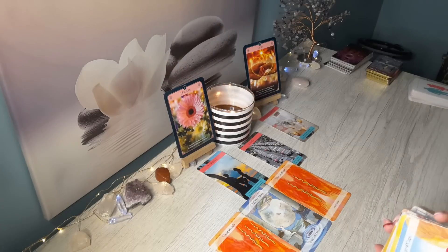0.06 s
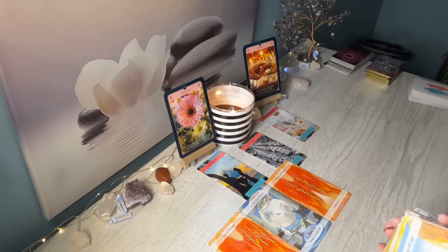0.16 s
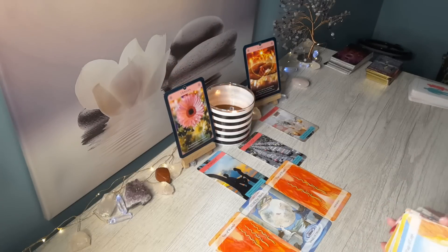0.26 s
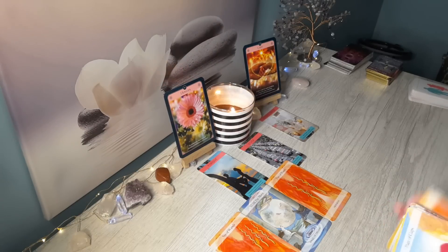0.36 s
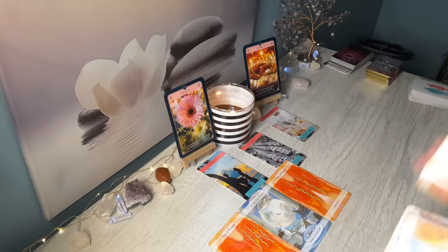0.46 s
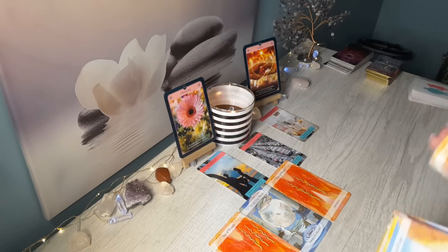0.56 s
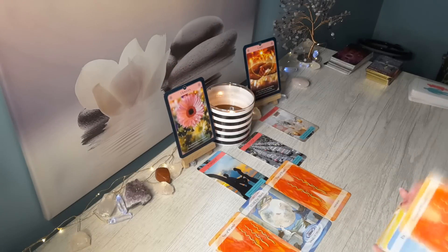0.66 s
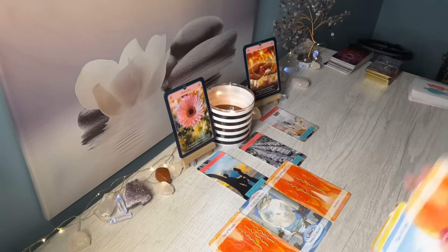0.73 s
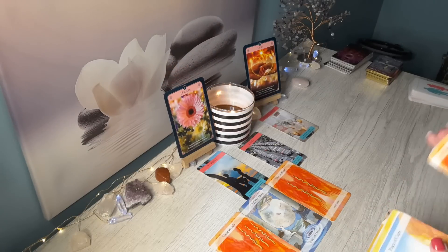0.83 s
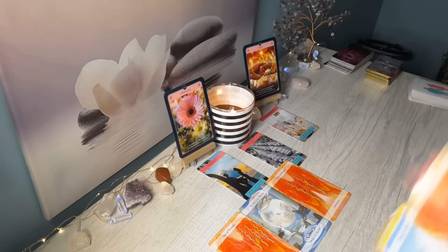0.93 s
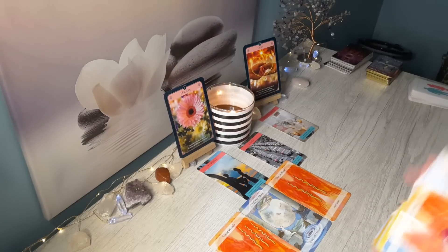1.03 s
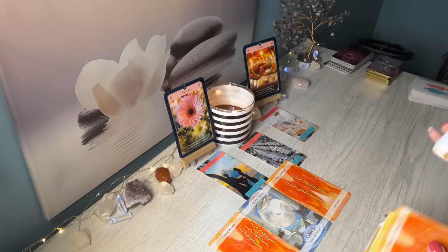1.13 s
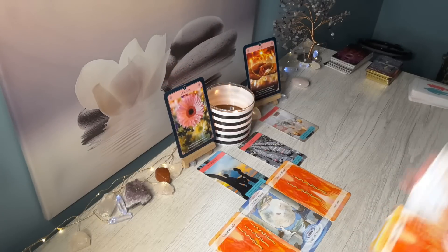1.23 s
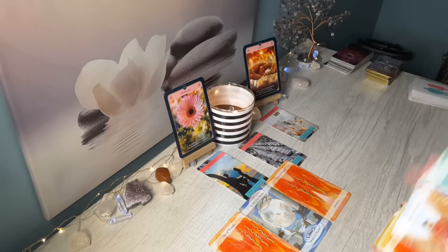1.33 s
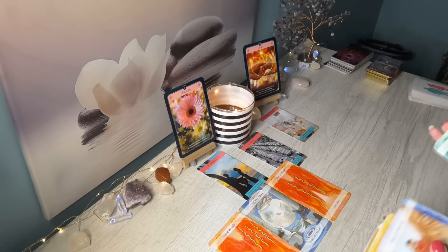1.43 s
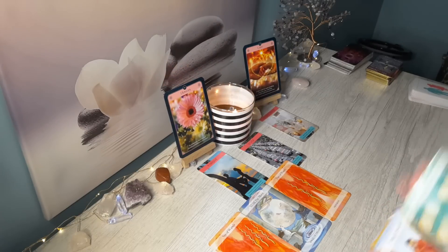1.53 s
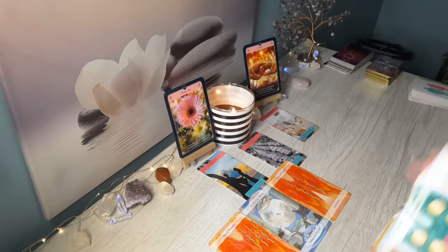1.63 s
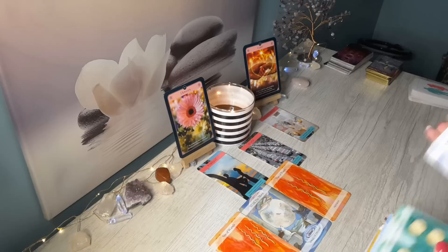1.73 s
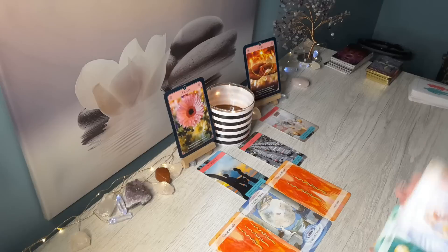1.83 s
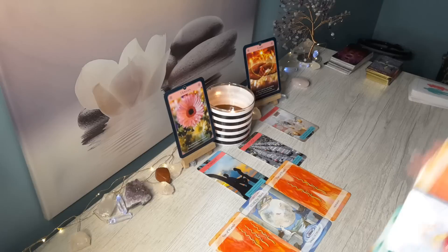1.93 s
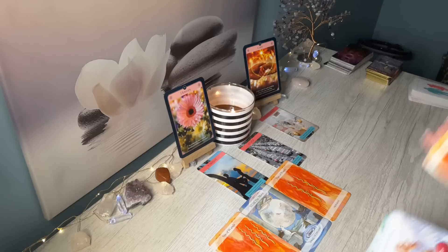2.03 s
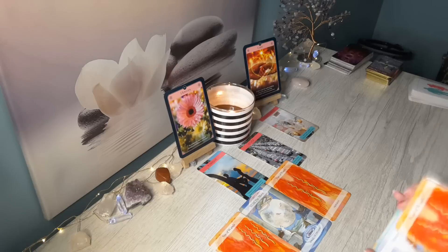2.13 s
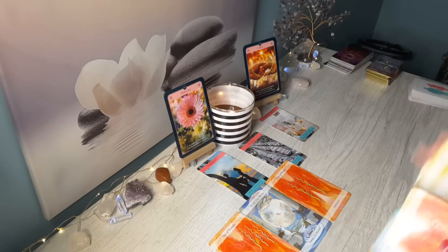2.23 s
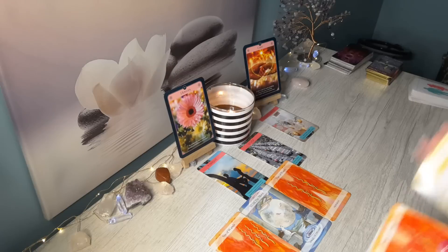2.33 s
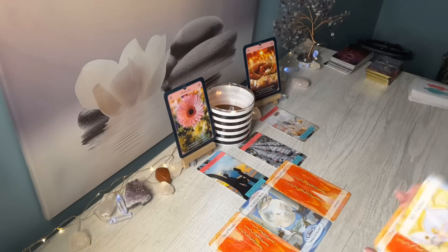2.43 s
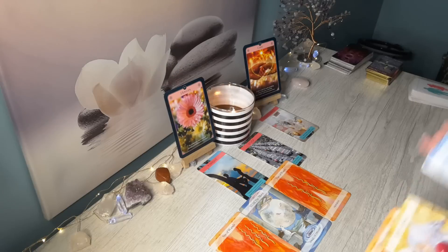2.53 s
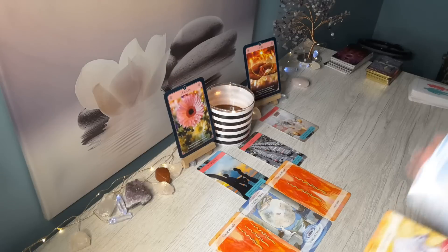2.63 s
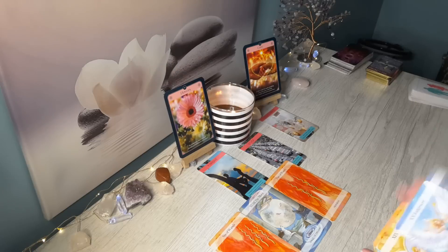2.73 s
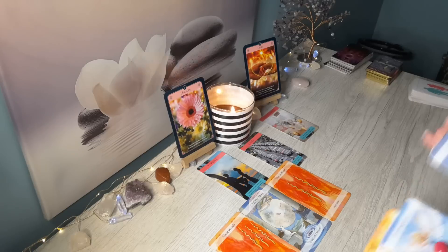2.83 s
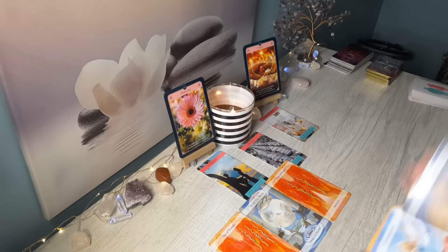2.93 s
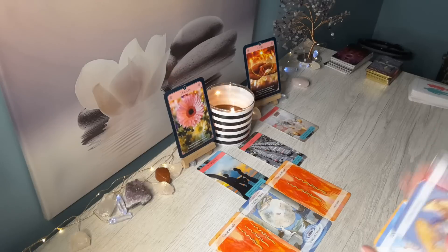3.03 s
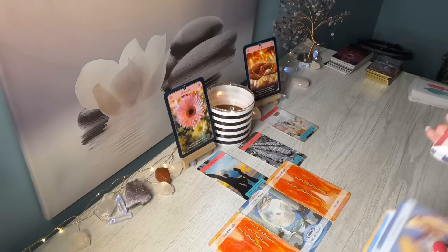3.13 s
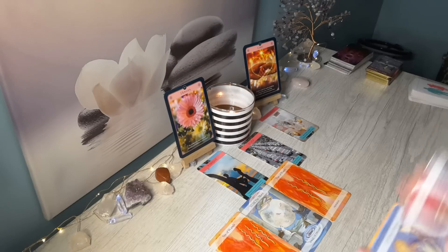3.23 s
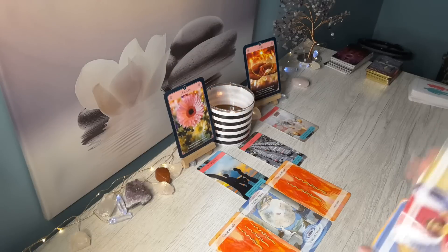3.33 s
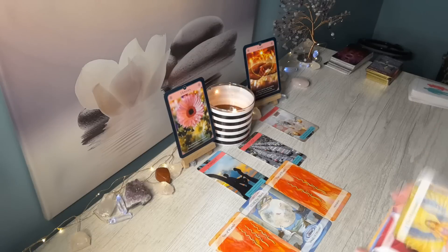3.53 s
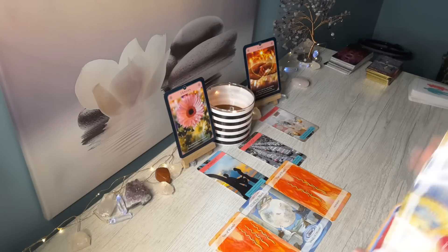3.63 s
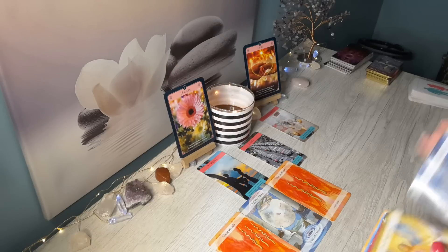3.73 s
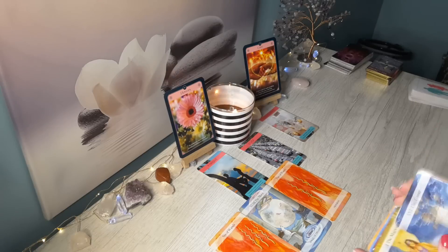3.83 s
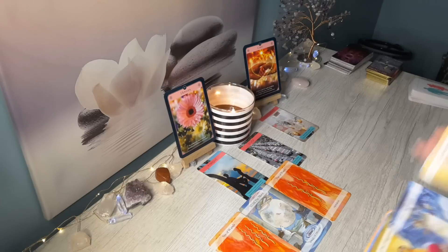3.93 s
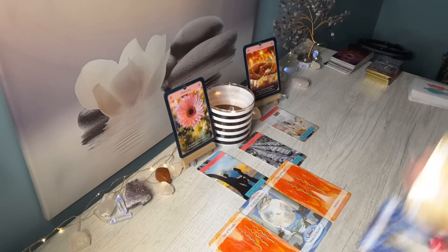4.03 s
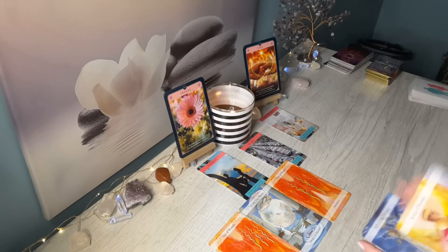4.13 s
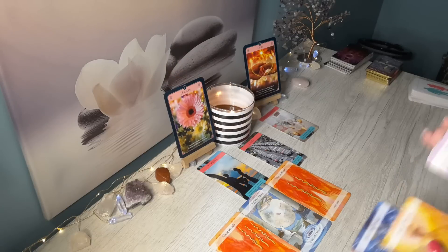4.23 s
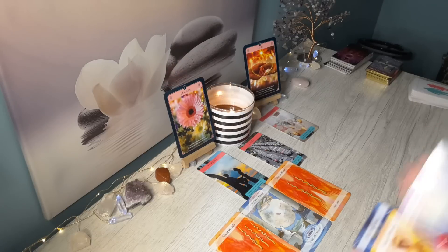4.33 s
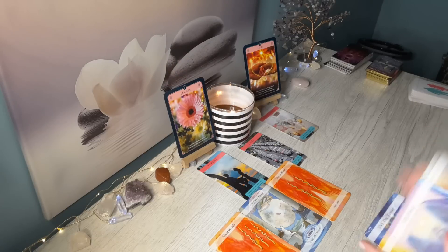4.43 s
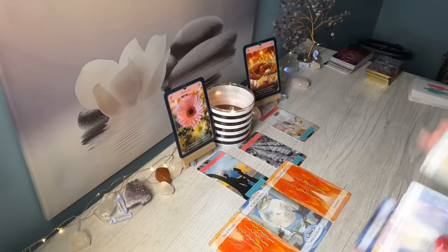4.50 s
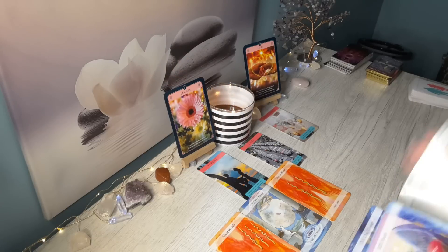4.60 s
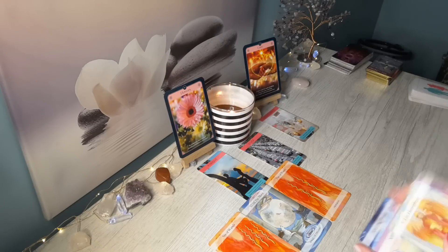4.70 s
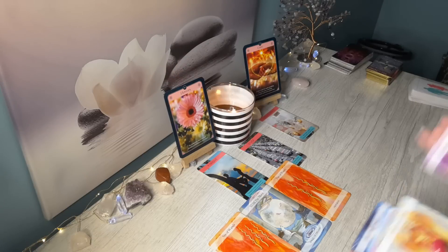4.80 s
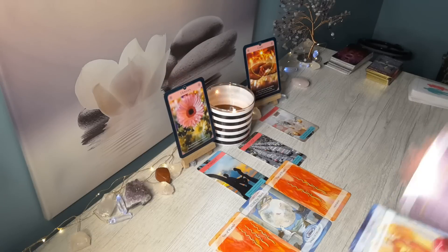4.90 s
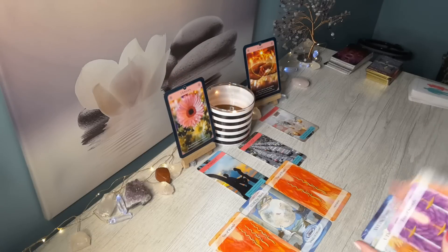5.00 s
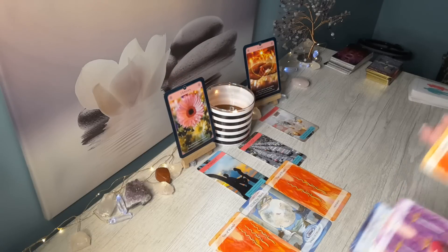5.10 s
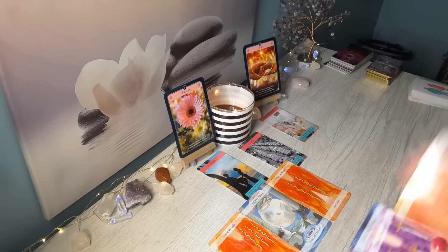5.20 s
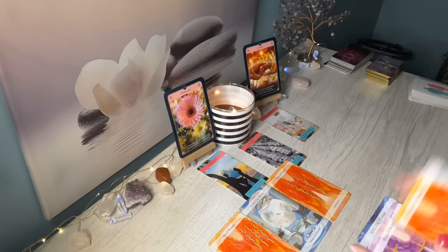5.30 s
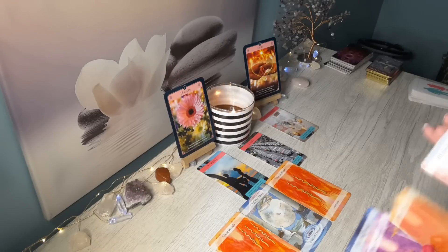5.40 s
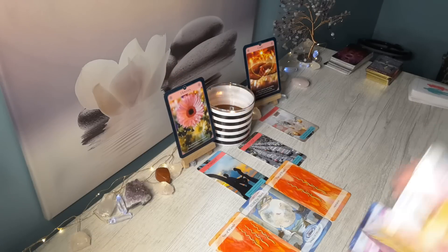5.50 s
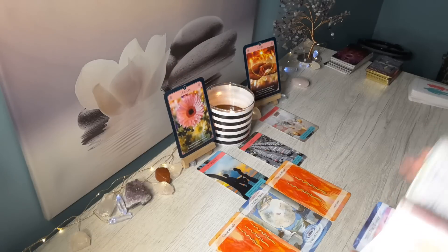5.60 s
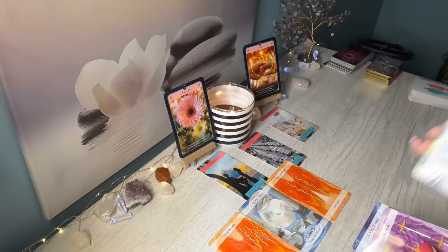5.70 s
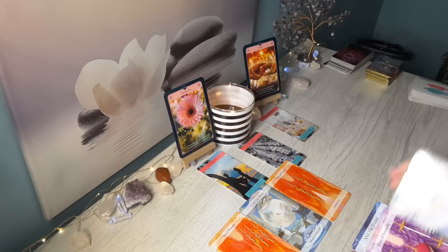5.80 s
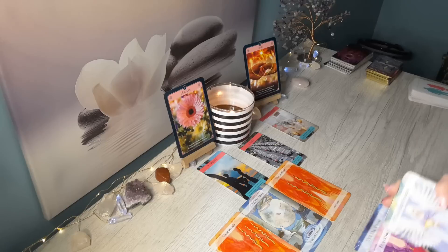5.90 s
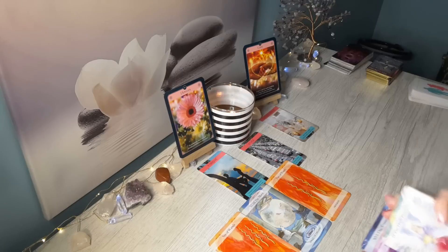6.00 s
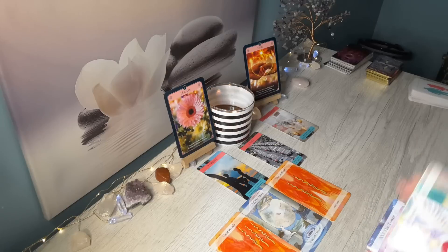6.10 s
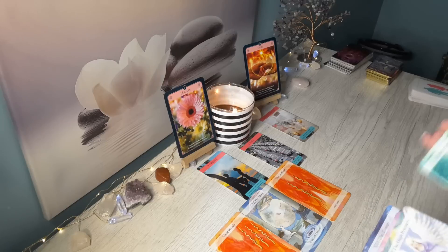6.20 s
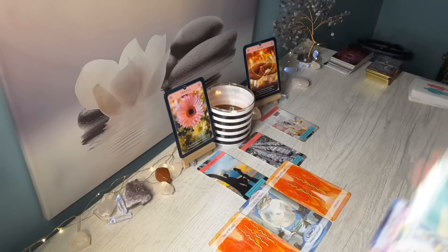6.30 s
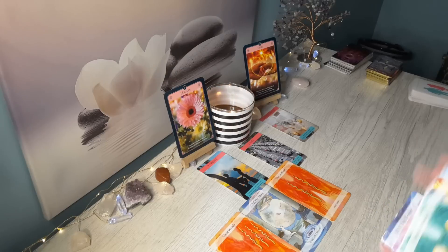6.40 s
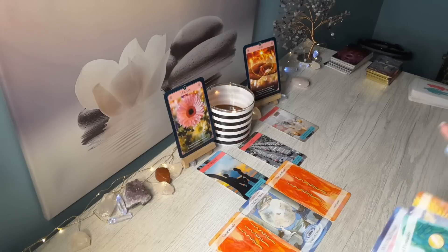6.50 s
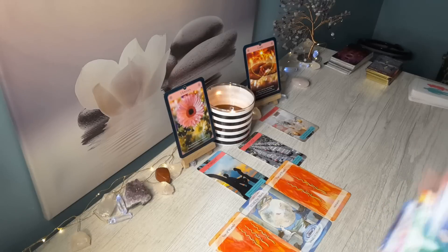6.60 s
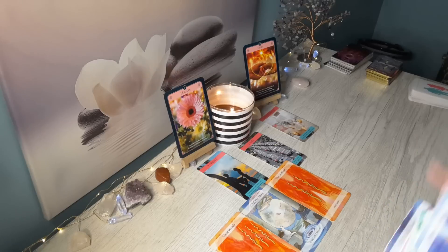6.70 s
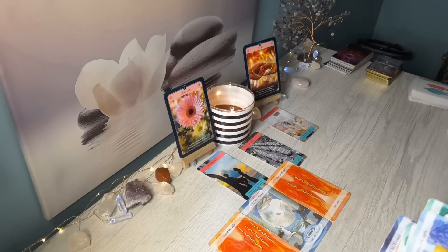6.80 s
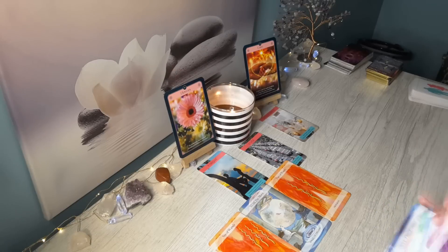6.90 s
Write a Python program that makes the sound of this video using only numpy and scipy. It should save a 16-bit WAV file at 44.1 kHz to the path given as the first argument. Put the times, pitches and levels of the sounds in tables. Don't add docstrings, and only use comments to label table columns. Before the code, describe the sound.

A small, quiet room with faint steady hush. From about 0.3 s a soft papery hiss rises, swelling at 0.45-0.6 s, with another airy rub near 0.8 s. At 1.1-1.2 s the first crisp slap lands and an overhand shuffle of stiff cards settles in, a stroke roughly every 0.3 s: thumb tick, gritty slide, bright snap, dull thump into the cupped palm, short slither. Strokes vary; a strong swish comes at 2.3 s, firm slaps at 2.9 and 3.2 s, fuller clacks at 4.0, 4.3 and 4.6 s. The sharpest slap is at 5.6 s, with a woody, flexing knock at 5.8 s. From 6 to 6.9 s only light hisses and small muted taps remain, then near quiet. The microphone is close, with brief room reflections and piercing treble leaning left.

```python
import sys
import numpy as np
from scipy import signal
from scipy.fft import rfft, irfft, next_fast_len
from scipy.io import wavfile
from scipy.ndimage import uniform_filter1d

SR = 44100
rng = np.random.default_rng(int(sys.argv[2]) if len(sys.argv) > 2 else 0)


def bounce(signal):
    frames = np.transpose(np.atleast_2d(signal))
    limited = np.clip(frames, -1, 1)
    pcm = np.round(limited * 32767).astype(np.int16)
    wavfile.write(sys.argv[1], SR, pcm)


def volts(x):
    e = np.asarray(x, float) / 20
    return 10 ** e


N = 306495


def unit(x):
    return x / np.sqrt(np.mean(x ** 2) + 1e-20)


def along(points, hz):
    point_hz, value = np.transpose(points)
    return np.interp(np.log(hz + 1), np.log(point_hz + 1), value)


def filtered(x, response):
    size = next_fast_len(N + SR // 2)
    spectrum = rfft(x, size) * response(np.fft.rfftfreq(size, 1 / SR))
    return irfft(spectrum, size)[..., :N]


def modes(table):
    def response(f):
        total = 0
        for k, (centre_hz, width_hz, level_db) in enumerate(table):
            damping = 1j * f * width_hz
            sign = (-1) ** k
            total = total + sign * volts(level_db) * damping / (centre_hz ** 2 - f * f + damping)
        return total / np.sqrt(np.mean(abs(total) ** 2))
    return response


def colour(points):
    def response(f):
        cepstrum = irfft(np.log(volts(along(points, f))))
        cepstrum[1:len(f) - 1] *= 2
        cepstrum[len(f):] = 0
        gain = np.exp(rfft(cepstrum))
        return gain / np.sqrt(np.mean(abs(gain) ** 2))
    return response


# frequency_hz, density_db [dB per Hz]
HUSH = [(25, -8), (58, -8.5), (159, -6.5), (200, -11), (339, -13), (1000, -19), (3000, -20.5), (5800, -26),
        (7300, -18), (8300, -15.5), (10000, -22.5), (13000, -20), (16000, -25.5), (16800, -49)]
HUSH_DB = -68.5


def hush():
    noise = filtered(rng.standard_normal((3, N)), lambda f: volts(along(HUSH, f)))
    shared, left, right = unit(noise)
    return volts(HUSH_DB) * (shared + 0.26 * np.array([left, right]))


# frequency_hz, level_db
EDGE = [(2500, -22), (4500, -11.5), (6200, -13), (7300, -2.5), (8200, 7.5), (9300, -3), (11000, -7),
        (15500, -14.5)]
# frequency_hz, level_db
FLEX = [(500, -28), (1100, 1), (1600, 4), (2400, 2.5), (3400, 4.5), (4800, -1.5), (7000, -1),
        (15000, -19.5)]
# centre_hz, width_hz, level_db
THUMP = [(299, 92, -0.5), (522, 43, 5), (700, 200, 3.5), (860, 1030, -11)]


def body(edge, flex, thump):
    return filtered(edge, colour(EDGE)) + filtered(flex, colour(FLEX)) + filtered(thump, modes(THUMP))


def grit(rate_hz, depth_db):
    knots = np.minimum(rng.exponential(size=N // 20 + 2), 3.5)
    position = np.arange(N) * np.clip(rate_hz / SR, 0, 1 / 20)
    size = np.interp(position, np.arange(len(knots)), knots)
    return unit(volts(depth_db * size) * rng.standard_normal(N))


def patchy(x, depth_db):
    z = signal.stft(x, nperseg=256)[2]
    field = uniform_filter1d(rng.standard_normal(z.shape), size=6, axis=0)
    field = uniform_filter1d(field, size=6, axis=1)
    return unit(signal.istft(z * volts(depth_db * unit(field)), nperseg=256)[1][:N])


SWELL_MS = 12.5
HISS_PATCH_DB, SCRAPE_GRIT_DB = 3.2, 4.2


def slides(strokes):
    force = np.zeros((4, N))
    for start_s, end_s, from_db, to_db, scrape_db, rustle_db, air_db in sorted(strokes):
        span = slice(round(start_s * SR), round(end_s * SR))
        fade_db = np.linspace(from_db, to_db, span.stop - span.start)
        steady_db = np.array([[scrape_db], [rustle_db], [air_db]])
        force[0, span] = volts(fade_db)
        force[1:, span] = volts(steady_db)
    hiss, scrape, rustle, air = uniform_filter1d(force, 120, axis=1)
    swell = max(round(SWELL_MS * SR / 1000), 1)
    hiss = np.roll(uniform_filter1d(hiss, swell), swell // 3)
    hiss = hiss * patchy(grit(rate_hz=590, depth_db=1.5), HISS_PATCH_DB)
    top = filtered(hiss, lambda f: 1 / (1 + (10800 / (f + 1)) ** 8))
    hiss = hiss + (air - 1) * top
    scrape = scrape * patchy(grit(rate_hz=330, depth_db=SCRAPE_GRIT_DB), depth_db=1.5)
    rustle = rustle * grit(rate_hz=150, depth_db=5.5)
    return body(hiss, scrape, rustle)


# start_s, end_s, hiss_start_db, hiss_end_db
DRAWS = [(0.286, 0.432, -77, -66), (0.427, 0.492, -66, -46), (0.469, 0.532, -67, -49),
         (1.091, 1.17, -54, -53), (1.357, 1.441, -71, -47.5), (1.513, 1.529, -80, -41),
         (1.687, 1.753, -55, -53), (1.94, 2.023, -66, -50), (2.265, 2.342, -48.5, -60),
         (2.54, 2.616, -50, -53.5), (2.818, 2.88, -54, -49), (3.107, 3.159, -52.5, -49),
         (3.404, 3.468, -48, -51.5), (3.699, 3.77, -49, -56), (4.228, 4.293, -50.5, -54.5),
         (4.504, 4.565, -55.5, -51), (4.805, 4.884, -53, -51), (5.098, 5.176, -53.5, -47.5),
         (5.383, 5.46, -56.5, -48.5), (5.755, 5.796, -62, -53), (6.016, 6.087, -69, -46),
         (6.15, 6.195, -64, -51), (6.201, 6.286, -52.5, -51), (6.43, 6.514, -61, -59),
         (6.512, 6.57, -52, -59.5), (6.756, 6.85, -53, -57.5)]
DRAW_SCRAPE_DB, DRAW_RUSTLE_DB, DRAW_AIR_DB = -16, -24, -1.5


def draws():
    strokes = []
    for start_s, end_s, from_db, to_db in DRAWS:
        mean_db = (from_db + to_db) / 2
        strokes.append((start_s, end_s, from_db, to_db,
                        mean_db + DRAW_SCRAPE_DB, mean_db + DRAW_RUSTLE_DB, DRAW_AIR_DB))
    return strokes


WALL_MS, WALL_DB = 7, -14.5


def wall(x):
    return volts(WALL_DB) * np.roll(x, round(WALL_MS * SR / 1000))


# frequency_hz, t60_s
ROOM = [(200, 0.26), (700, 0.28), (2000, 0.28), (8000, 0.27), (14000, 0.22)]
# frequency_hz, level_db
WET = [(1000, -3), (5000, -6.5), (12000, -9)]


def room(x):
    wet, step = np.zeros(N + SR), SR // 8
    for start in range(0, N, step):
        hz, t, z = signal.stft(rng.standard_normal(SR // 3), SR, nperseg=256)
        decay = volts(-60 * t / along(ROOM, hz)[:, None])
        tail = signal.istft(z * decay, SR, nperseg=256)[1]
        echo = signal.fftconvolve(x[start:start + step], tail / np.linalg.norm(tail))
        wet[start + 180:][:len(echo)] += echo
    return filtered(wet[:N], lambda f: volts(along(WET, f)))


# start_s, end_s, hiss_db, scrape_db
PEELS = [(0.51, 0.587, -52, -75), (0.763, 0.811, -47.5, -63), (0.812, 0.848, -47.5, -81),
         (1.06, 1.091, -56, -69), (1.656, 1.679, -60, -69.5), (2.221, 2.28, -59, -65.5),
         (2.501, 2.55, -58, -62.5), (2.793, 2.81, -53, -63), (3.056, 3.104, -54.5, -70),
         (3.35, 3.423, -52.5, -68.5), (3.633, 3.715, -50.5, -78), (3.88, 3.973, -47, -72),
         (4.175, 4.232, -52.5, -72), (4.471, 4.51, -46.5, -60), (4.757, 4.812, -50.5, -68),
         (5.052, 5.102, -50.5, -67), (5.32, 5.372, -51, -64), (5.989, 6.035, -63, -85),
         (6.09, 6.148, -48.5, -82), (6.722, 6.752, -48.5, -70)]
PEEL_FADE_DB, PEEL_RUSTLE_DB, PEEL_AIR_DB = -16, -16.5, 3.5


def peels():
    return [(start_s, end_s, hiss_db, hiss_db + PEEL_FADE_DB, scrape_db, scrape_db + PEEL_RUSTLE_DB, PEEL_AIR_DB)
            for start_s, end_s, hiss_db, scrape_db in PEELS]


def snaps(contacts):
    push, t = np.zeros((3, N + SR)), np.arange(2048) / SR
    for start_s, length_ms, edge_db, flex_db, flex_hz, thump_db in contacts:
        spent = t / np.clip(length_ms / 1000, .0003, .015)
        rise = 1 - np.exp(-(4.3 + 20 / length_ms) * spent)
        shape = np.exp(-1.1 * spent ** 0.82) * rise
        shape += 1.86 * np.exp(-length_ms / 6) * np.exp(-t / 0.00054)
        ragged = volts(2.0 * np.repeat(rng.standard_normal(64), 32))
        burst = rfft(shape * ragged * rng.standard_normal((3, len(t))))
        burst = irfft(burst / abs(burst)) * shape ** .5
        soft = np.clip(0.039 * (-48 - edge_db), 0, .8)
        burst[0] = signal.lfilter([1], [1, -soft], burst[0])
        hard = min(.45 * volts((flex_db + 70) / 3), (flex_hz / 2600) ** 1.5)
        bend = signal.lfilter(*signal.iirpeak(flex_hz, 4.2, SR), burst[1])
        burst[1] = hard * burst[1] + bend
        energy = volts([[edge_db], [flex_db], [thump_db]]) * np.sqrt(SR)
        burst = energy * burst / np.linalg.norm(burst, axis=1, keepdims=True)
        push[:, round(start_s * SR):][:, :len(t)] += burst
    return body(*push[:, :N])


# start_s, flex_db, flex_hz, thump_db
LANDINGS = [(0.568, -81, 1200, -84), (1.1233, -86, 1580, -79), (1.1775, -76.5, 3850, -75),
            (1.439, -78, 1620, -79.5), (1.4877, -78, 2160, -73.5), (1.7394, -78, 1660, -66.5),
            (2.0167, -81, 1650, -78.5), (2.0424, -83, 2240, -75), (2.0605, -83, 2250, -69.5),
            (2.0915, -77, 1350, -71.5), (2.101, -101, 1060, -81), (2.6101, -78, 1650, -81),
            (2.8719, -73.5, 1550, -67.5), (2.9014, -68.5, 1590, -61.5), (2.9082, -74, 1550, -70),
            (3.1829, -73, 1430, -69), (3.494, -68.5, 970, -62), (3.7663, -71.5, 1070, -72),
            (3.8808, -77, 3200, -72), (4.2706, -71, 1540, -68), (4.6328, -73, 2670, -81),
            (5.17, -80, 2190, -79), (5.179, -69, 2220, -69.5), (5.7069, -76, 1860, -73),
            (5.8025, -71, 1500, -80), (6.5707, -81, 1760, -75), (6.7187, -93, 2160, -82),
            (6.862, -76, 3200, -75), (6.284, -78, 1300, -86), (3.075, -84, 2180, -81)]
LANDING_MS, LANDING_EDGE_DB = 4.35, -10


def landings():
    return [(start_s, LANDING_MS, flex_db + LANDING_EDGE_DB, flex_db, flex_hz, thump_db)
            for start_s, flex_db, flex_hz, thump_db in LANDINGS]


# start_s, length_ms, edge_db, flex_hz
FLICKS = [(0.76, 18, -63, 1670), (1.5265, 1.3, -61, 3100), (1.754, 9.4, -60, 1700), (2.327, 8, -56, 1300),
          (2.597, 12, -64, 1800), (2.88, 6.6, -60.5, 2000), (3.453, 12, -55.5, 1610),
          (4.288, 20, -53, 2000), (4.865, 14, -57, 1600), (5.3329, 2.8, -62.5, 4700),
          (5.4512, 8.9, -62, 4400), (5.9812, 2.1, -66, 2200), (5.802, 2.9, -63.5, 3600),
          (0.568, 3.2, -68.5, 3600), (6.284, 1.4, -66.5, 1300), (6.863, 2.7, -70, 2300),
          (6.7182, 3.6, -74, 1400), (7.2, 3.3, -73.5, 1650), (6.1387, 0.98, -75, 2700)]
FLICK_FLEX_DB, FLICK_THUMP_DB = -18, -23


def flicks():
    return [(start_s, length_ms, edge_db, edge_db + FLICK_FLEX_DB, flex_hz, edge_db + FLICK_THUMP_DB)
            for start_s, length_ms, edge_db, flex_hz in FLICKS]


RING_RISE_MS = .6


def single_modes(touches):
    out, t = np.zeros(N + SR), np.arange(2048) / SR
    for start_s, pitch_hz, level_db, width_hz in touches:
        swell = 1 - np.exp(-1000 * t / RING_RISE_MS)
        tone = np.sin(2 * np.pi * pitch_hz * t) * np.exp(-np.pi * width_hz * t) * swell
        out[round(start_s * SR):][:len(t)] += volts(level_db) * np.sqrt(SR) * tone / np.linalg.norm(tone)
    return out[:N]


# start_s, pitch_hz, level_db, width_hz
RINGS = [(0.765, 1500, -81, 250), (1.178, 4200, -74, 900), (1.2009, 4200, -64, 900),
         (1.1233, 650, -80, 150), (1.656, 1330, -86, 120), (1.7394, 330, -72, 60), (2.2218, 2500, -79, 700),
         (2.322, 450, -71, 200), (2.5032, 1750, -78, 400), (2.643, 1000, -67, 200),
         (2.7871, 1740, -80, 400), (3.188, 1500, -70, 250), (3.3543, 2260, -80, 400),
         (3.476, 3100, -73, 400), (3.768, 2300, -76, 400), (3.7887, 720, -69, 120), (3.8808, 680, -65, 120),
         (3.8808, 312, -73, 65), (3.8808, 1560, -76, 120), (3.918, 2020, -77, 700),
         (4.1819, 2030, -75, 500), (4.272, 1540, -68, 250), (4.2706, 750, -71, 200),
         (4.3095, 2450, -67, 450), (4.3115, 3200, -70, 500), (4.3346, 720, -60, 130),
         (4.3346, 560, -66, 80), (4.4702, 2020, -75, 300), (4.5741, 2900, -68, 400),
         (4.7591, 2030, -76, 500), (5.0549, 2020, -81, 300), (5.0973, 1590, -81, 300),
         (5.181, 2290, -66, 200), (5.204, 2290, -73, 300), (5.5904, 1770, -61, 300),
         (5.5904, 3370, -60, 400), (5.628, 1800, -64, 400), (5.8025, 1550, -72, 200),
         (5.8166, 1260, -58, 160), (5.8166, 1050, -65, 250), (5.5904, 5300, -62, 700),
         (6.284, 3200, -76, 1500), (6.5707, 3200, -84, 400), (5.8166, 3040, -65, 200),
         (6.1387, 2300, -86, 400), (6.278, 500, -76, 60), (6.278, 850, -78, 80), (6.5707, 520, -78, 60),
         (6.862, 1300, -80, 100)]


def rings():
    return single_modes(RINGS)


# start_s, edge_db, flex_db, thump_db
GRIPS = [(1.069, -74, -91, -86), (1.379, -88, -95, -99), (1.9466, -75, -85, -96), (2.0381, -76, -94, -81),
         (2.2219, -71.5, -74, -80.5), (2.5036, -66, -74, -85), (2.788, -69.5, -78, -84),
         (3.3528, -72, -81, -82.5), (3.633, -74, -80, -79), (3.6974, -70, -89, -84.5),
         (3.9192, -78, -83, -93), (4.1808, -73, -80, -77), (4.2216, -71.5, -83, -102),
         (4.469, -80, -80, -79), (4.4838, -94, -85, -83), (4.7588, -85, -81, -85),
         (5.0551, -74, -79.5, -77), (5.0986, -80, -77.5, -101), (5.3208, -71, -86, -84.5),
         (5.8779, -66, -95, -85), (1.461, -74, -83, -75), (1.778, -75, -79, -67.5), (4.0, -85, -75, -81),
         (1.656, -83, -93, -94), (6.4413, -71, -93, -94), (6.4481, -77, -82.5, -87)]
GRIP_MS, GRIP_HZ = 4, 1950


def grips():
    return [(start_s, GRIP_MS, edge_db, flex_db, GRIP_HZ, thump_db)
            for start_s, edge_db, flex_db, thump_db in GRIPS]


# start_s, end_s, hiss_db, scrape_db, rustle_db
SETTLES = [(1.161, 1.188, -50, -55, -52), (1.452, 1.497, -43, -55.5, -67), (1.738, 1.783, -41, -55, -58),
           (2.025, 2.062, -44, -62, -74), (2.048, 2.068, -54, -57.5, -67), (2.314, 2.36, -36, -45.5, -43.5),
           (2.336, 2.394, -45.5, -59, -54.5), (2.607, 2.633, -46, -59, -54.5),
           (2.872, 2.92, -44.5, -62, -64), (3.164, 3.195, -44, -57.5, -52), (3.451, 3.514, -43, -53, -57),
           (3.751, 3.779, -47, -53.5, -56), (3.984, 4.01, -41.5, -60, -62), (4.004, 4.049, -37, -47, -52.5),
           (4.292, 4.3, -31, -66, -51), (4.569, 4.64, -40, -53, -51), (4.874, 4.902, -51, -47.5, -61.5),
           (5.171, 5.191, -44, -51, -55.5), (5.453, 5.516, -53, -62, -64), (5.62, 5.647, -39, -47, -64),
           (5.799, 5.906, -44.5, -54, -65)]
SETTLE_FADE_DB, SETTLE_AIR_DB = -14.5, 1


def settles():
    return [(start_s, end_s, hiss_db, hiss_db + SETTLE_FADE_DB, scrape_db, rustle_db, SETTLE_AIR_DB)
            for start_s, end_s, hiss_db, scrape_db, rustle_db in SETTLES]


# start_s, edge_db, flex_db, flex_hz, thump_db
SLAPS = [(1.2009, -56, -59.5, 2100, -68), (1.5182, -72, -73.5, 1920, -74.5),
         (1.8027, -58, -63.5, 3700, -65.5), (2.0841, -61.5, -77.5, 2750, -87),
         (2.3202, -63, -67.5, 2470, -63), (2.3846, -63, -69.5, 3570, -81),
         (2.6428, -61.5, -68, 1110, -64.5), (2.9337, -52.5, -63.5, 3760, -61.5),
         (3.212, -54, -65, 4070, -63.5), (3.4769, -85, -75, 1500, -66.5), (3.7887, -60, -65, 2680, -63.5),
         (4.006, -57.5, -60.5, 3330, -60), (4.0146, -68, -67, 1460, -73), (4.308, -79, -68, 2470, -84),
         (4.3346, -58, -60, 4140, -65), (4.5741, -58.5, -59, 1730, -63), (4.8811, -80, -70, 1700, -73),
         (4.9049, -56, -68, 2260, -62.5), (5.2043, -56.5, -66.5, 1880, -66),
         (5.471, -66.5, -77.5, 3420, -77), (5.5904, -49.5, -53, 2500, -57.5),
         (5.5999, -55.5, -63, 1834, -75), (5.8166, -64, -60, 2600, -67), (6.278, -69, -75, 2600, -77)]
SLAP_MS, SLAP_SHORTENS = 3.02, 1


def slaps():
    return [(start_s, SLAP_MS * (2500 / flex_hz) ** SLAP_SHORTENS, edge_db, flex_db, flex_hz, thump_db)
            for start_s, edge_db, flex_db, flex_hz, thump_db in SLAPS]


# start_s, pitch_hz, level_db, width_hz
CATCHES = [(1.379, 5800, -84, 1200), (1.595, 8200, -80, 1500), (1.88, 8200, -77, 1500),
           (2.0925, 8200, -71, 900), (3.136, 8300, -73, 900), (3.416, 7800, -72, 900),
           (3.496, 8500, -67, 700), (3.65, 8600, -77, 900), (4.782, 8300, -74, 1200),
           (4.845, 8200, -72, 900), (4.99, 8200, -79, 1500), (5.166, 8400, -68, 900),
           (5.289, 8500, -80, 1200), (5.709, 8300, -74, 900), (5.96, 8200, -80, 1200),
           (5.9812, 8400, -66, 600), (6.1387, 8500, -74, 700), (6.545, 8800, -80, 1500)]


def catches():
    return single_modes(CATCHES)


# start_s, level_db
PALM = [(1.5163, -75), (1.7402, -73.5), (1.8005, -78), (2.016, -77), (2.0593, -78), (2.3232, -73),
        (2.3839, -76), (2.6012, -79), (2.6457, -73), (2.8734, -70.5), (2.9344, -70.5), (3.1845, -71),
        (3.4555, -73), (3.4949, -77), (3.769, -69.5), (3.881, -78), (4.0073, -71), (4.2715, -74.0),
        (4.3368, -75), (4.5714, -67), (4.8673, -71), (5.17, -79), (5.2042, -86), (5.451, -76),
        (5.5902, -84), (5.707, -75), (6.2772, -68), (6.572, -69), (6.7192, -78.5), (6.8647, -73)]
# centre_hz, width_hz, level_db
HOLLOW = [(72, 40, -10.5), (117, 56, -7), (236.3, 23.3, 2)]


def palm():
    push = np.zeros(N)
    for start_s, level_db in PALM:
        push[round(start_s * SR) + 60] = volts(level_db) * np.sqrt(SR)
    return filtered(push, lambda f: modes(HOLLOW)(f) / (1 + 1j * f / 400) ** 2)


def scene():
    rubbing = slides(draws() + peels() + settles())
    blows = snaps(landings() + flicks() + grips() + slaps())
    cards = rubbing + blows + rings() + catches() + palm()
    return hush() + cards + wall(cards) + room(cards)


def band_limit(x):
    return signal.sosfilt(signal.butter(12, 16980, fs=SR, output="sos"), x)


# frequency_hz, left_over_right_db
LEFT = [(300, 0), (700, -0.6), (1400, 0.2), (2300, 3), (4000, 3.5), (6000, 6.5), (7000, 13.5), (8200, 12.5),
        (9500, 8), (10600, 1), (12000, -2.5), (15000, -1)]
TOP_HZ = 15800
OFFSET = -.0005


def record(dry):
    def ports_response(f):
        lean = volts(along(LEFT, f))
        low_cut = (1j * f / (1j * f + 45)) ** 2
        high_cut = volts(-23 * (f > TOP_HZ) - 40 * (f > TOP_HZ + 1000))
        return low_cut * high_cut * 2 / (1 + lean) * np.array([lean, np.ones(len(f))])
    ports = filtered(dry, ports_response)
    ports = ports / (1 + abs(ports / .36) ** 4) ** (1 / 4)
    return band_limit(ports + OFFSET)


dry = scene()
out = record(dry)
bounce(out)
```